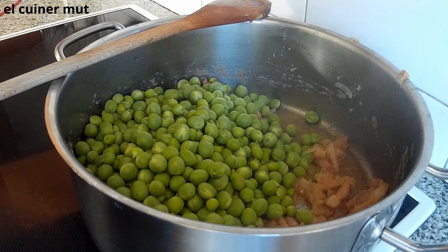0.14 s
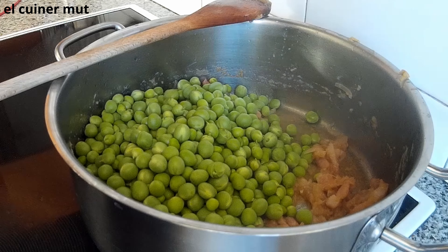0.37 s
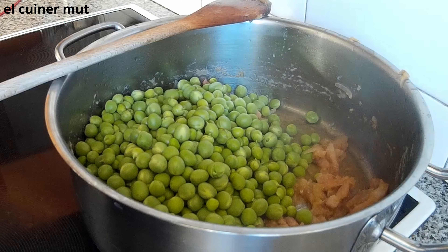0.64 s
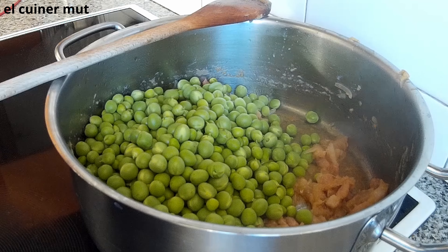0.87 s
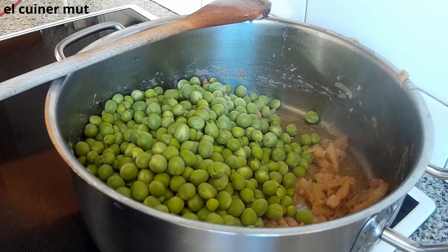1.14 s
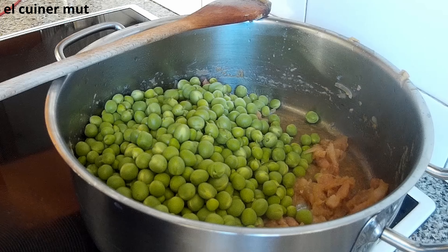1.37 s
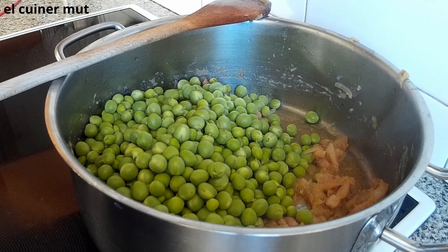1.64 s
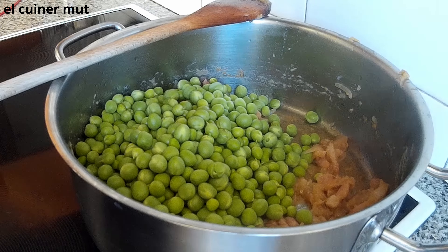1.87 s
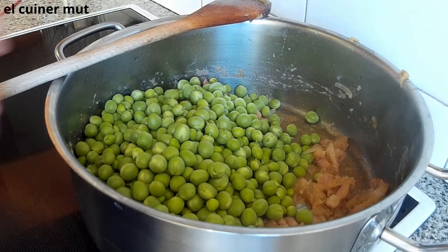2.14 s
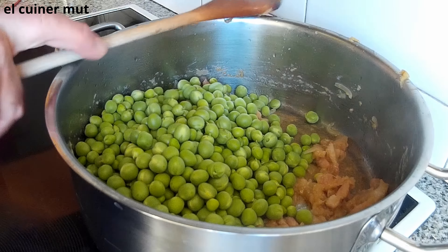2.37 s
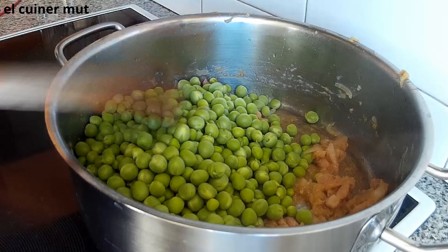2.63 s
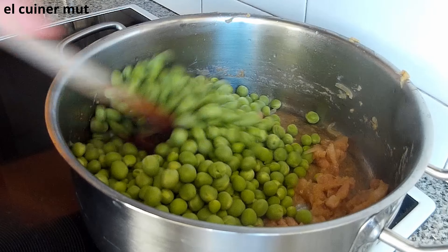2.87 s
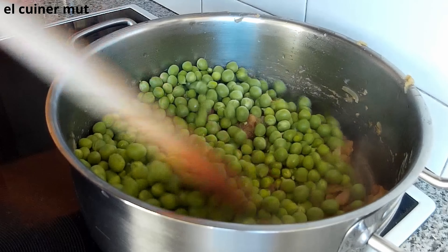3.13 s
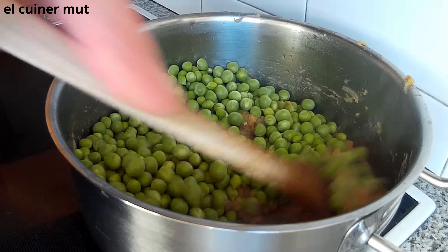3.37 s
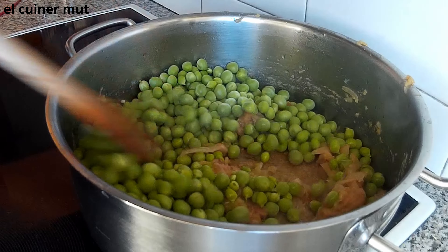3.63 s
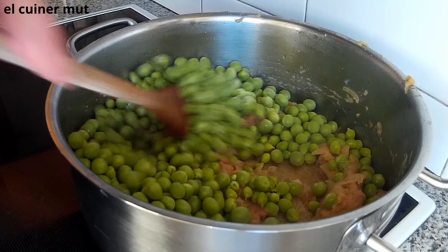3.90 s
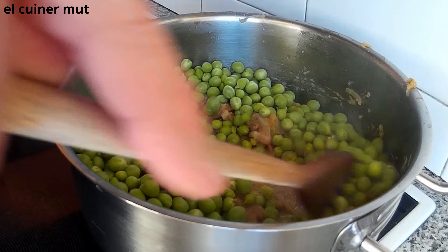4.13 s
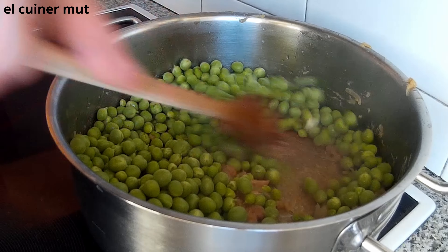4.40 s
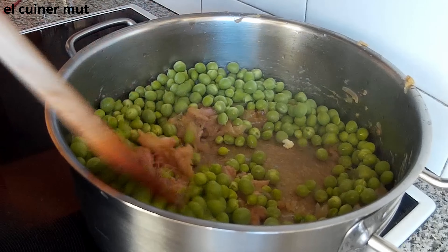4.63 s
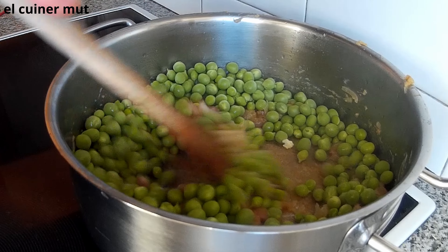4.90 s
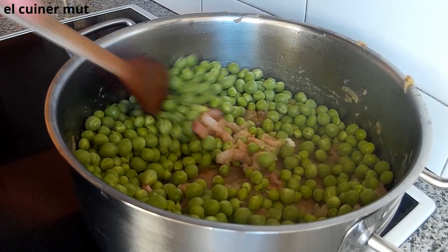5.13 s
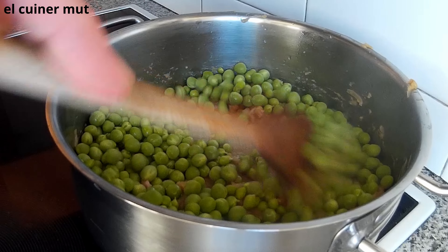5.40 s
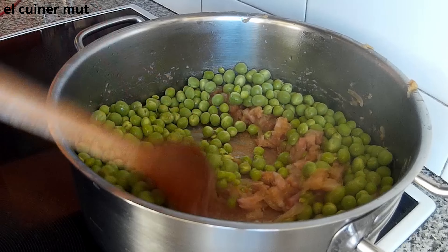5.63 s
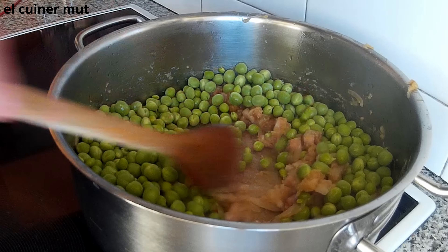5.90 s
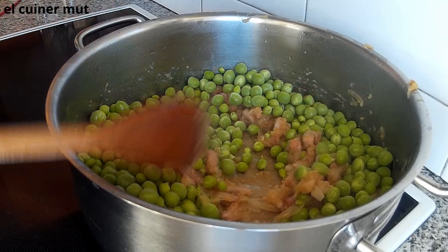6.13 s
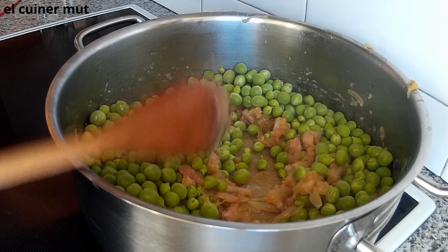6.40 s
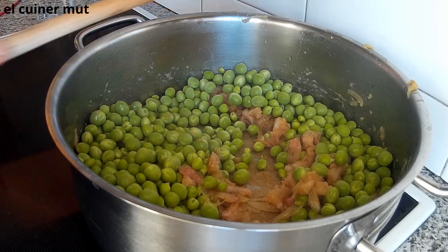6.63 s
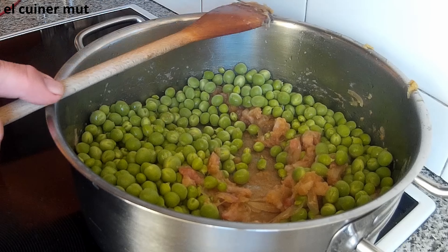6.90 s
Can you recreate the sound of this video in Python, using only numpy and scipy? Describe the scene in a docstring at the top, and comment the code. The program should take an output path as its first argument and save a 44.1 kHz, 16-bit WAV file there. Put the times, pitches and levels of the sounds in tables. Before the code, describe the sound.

A close microphone catches a quiet kitchen with slight hard-walled echo. A metal lid clinks, slides on its rim, then lands in a rapid clatter whose ring fades. Then a wooden spoon works through food in a steel pot: dull and higher woody knocks, brief scrapes, soft moist rustling and low thumps from the shifting base, in uneven bursts until the end.

```python
"""A wooden spoon stirs food in a steel pot: friction slips and knocks ring the pot's modes, zone by zone;
the base rocks on the hob and patchy noise makes the food rustle. Before that comes one faint knock, and a
steel lid is nudged, lifted and set down: blows and chatter ring its sheet and handle, one tone lingers.
All is heard close up in a small tiled kitchen: echo from sparse taps, steady noise for air and hiss."""
import sys
import numpy as np
from scipy import signal
from scipy.fft import rfft, irfft
from scipy.io import wavfile
from scipy.ndimage import uniform_filter1d

SR = 44100
rng = np.random.default_rng(int(sys.argv[2]) if len(sys.argv) > 2 else 0)


def rack_gain(trim_db):
    """Turn a fader trim in dB into the linear factor to multiply a signal by."""
    fader = np.asarray(trim_db, float)
    return 10 ** (fader / 20)


def wav_out(sig):
    """Save sig, one row per channel (or a flat mono array), as 16-bit PCM at SR to the path in sys.argv[1]."""
    wavfile.write(sys.argv[1], SR, np.round(np.clip(np.atleast_2d(sig).T, -1, 1) * 32767).astype(np.int16))


N = 309582

# Still room and microphone hiss. Each row: frequency in Hz, relative density in dB per Hz.
AIR_SPECTRUM = [(12, -39.5), (20, -9.5), (54, -2.5), (171, -8.5), (207, -8.5), (382, -14.5), (452, -15.5),
                (667, -17.5), (725, -18.5), (1040, -17.5), (2680, -25.5), (13100, -29), (15500, -30.5)]
# Echo of the kitchen. Each row: frequency in Hz, t60 in seconds.
KITCHEN_DECAY = [(100, 0.65), (500, 0.51), (1500, 0.29), (4000, 0.34), (10000, 0.24)]

# Lid sheet. Each row: frequency in Hz, relative level in dB, t60 in seconds when free.
SHEET_MODES = [(375, -11.5, 0.21), (429, -11.5, 0.26), (540, -9.5, 0.2), (600, -9, 0.14), (743, 1, 0.21),
               (777, -17, 0.46), (860, 1, 0.11), (884, -18, 0.15), (980, -7, 0.15), (1060, -9, 0.35),
               (1100, -7.5, 0.15), (1207, -10, 0.47), (1326, -6, 0.15), (1523, -6.5, 0.23),
               (1560, -15, 0.61), (1637, -18, .3), (1743, -13, 0.25), (1990, -14, 0.26), (1920, -16, 0.045)]
# Solid handle of the lid. Each row: frequency in Hz, relative level in dB, t60 in seconds when free.
HANDLE_MODES = [(2652, 6, 0.11), (2650, -1, 0.2), (3530, -13, .05), (4307, -2.5, 0.11), (4310, -13, 0.1),
                (6440, -23, 0.09), (6600, -22.5, 0.15), (7500, -29.5, 0.09), (8200, -34.5, 0.093),
                (9500, -33, 0.11)]
# Lid blows. Each row: start in seconds, relative level in dB, handle ring and air push as relative
# levels in dB within the blow, freedom to ring 0-1.
LID_BLOWS = [(1.21, -27, -21, 1, 0.46), (1.25, -36.5, -34, -8, 0.24), (1.273, -39, -18, -7, 0.45),
             (1.595, -23.5, -30, -2.5, 0.68), (1.6117, -26, -5, 24.5, .6), (1.6188, -30, -15, 16, .6),
             (1.63, -19, -6.5, 3.5, 0.78)]
# Lid sliding and chattering on the rim. Each row: time of full press in seconds, length in seconds,
# drive in dB, centre of the contact noise in Hz, its width in octaves.
LID_SLIDES = [(1.213, 0.11, -41, 914, 0.59), (1.428, 0.084, -54.5, 620, 0.56),
              (1.488, 0.036, -49.5, 740, 0.42), (1.546, 0.041, -38, 700, 0.6),
              (1.598, 0.1, -31.5, 1200, 0.8)]

# Pot with food in it. Each row: frequency in Hz, relative level in dB, t60 in seconds when not held.
POT_MODES = [(51.7, -16.5, 0.74), (101.6, -1, 0.35), (148, -1.5, 0.19), (191.2, -6.5, 0.15),
             (247, 4.5, 0.19), (322, 1, 0.16), (378.6, -4, 0.76), (438, -5, 0.2), (515, 1, 0.13),
             (575.3, -6.5, 0.47), (724, -0.5, 0.51), (920, -42, .25), (904.5, 11, 0.058),
             (1022, -3.5, 0.21), (1068, -9.5, 0.48), (1090, -0.5, 0.23), (1210, -4, 0.11),
             (1360, -9, 0.044), (1558, -3.5, 0.087), (1517, -5.5, 0.33), (1616, 4, 0.045),
             (1814, -13, 0.47), (1868, -3, 0.13), (2030, -12, 0.21), (2370, -15.5, 0.19),
             (2440, -14.5, 0.067), (2780, -8, 0.13), (3234, -7.5, 0.21), (3687, -6, 0.11),
             (4480, -9, 0.036), (6430, -27.5, .05), (9000, -27, .04)]
# Upper limits of base, belly, wall and upper wall; the rim lies above. Each entry: frequency in Hz.
POT_ZONE_TOPS_HZ = [220, 800, 1300, 2700]
# Wet food. Each row: frequency in Hz, relative density in dB per Hz.
RUSTLE_SPECTRUM = [(2500, -4.5), (3500, -2), (4500, 2), (5500, -8), (8000, -15), (11000, -7.5),
                   (14000, -11.5)]
# How hard the spoon works the food. Each row: time in seconds, effort in dB.
STIR_EFFORT = [(2.3, -83), (2.55, -78), (2.75, -60.5), (2.9, -60.5), (3.15, -64.5), (3.34, -58), (3.5, -64),
               (3.85, -65.5), (4.15, -64.5), (4.45, -66), (4.95, -69.5), (5.13, -76), (5.3, -73),
               (5.5, -63), (5.68, -74.5), (5.89, -71.5), (6.11, -85), (6.4, -69), (6.77, -73), (6.91, -66),
               (7.02, -84)]
# Short scrapes along the wall. Each row: start in seconds, swell in seconds, fade in seconds,
# wall drive in dB, belly and upper wall drive against it in dB.
WALL_SCRAPES = [(3.419, 0.0083, 0.048, -52, -6), (3.643, 0.027, 0.076, -41.5, -8),
                (4.118, 0.0083, 0.03, -49.5, -2), (4.619, 0.041, 0.042, -56, -3.5),
                (6.47, 0.017, 0.032, -53, -7), (6.64, 0.0094, 0.017, -49.5, -21)]
# Base rocking on the hob. Each row: centre in seconds, peak drive in dB, half length to 1/e in seconds.
BASE_ROCKS = [(2.807, -45, 0.017), (3.69, -54, .12), (4.14, -70, 0.11), (4.616, -63, 0.083),
              (5.115, -58, 0.089), (6.224, -55, .045), (6.356, -56, 0.065)]
# Spoon on pot. Each row: start in seconds, relative level in dB, pitch of the tock in Hz,
# base thump and rim as relative levels in dB within the knock.
SPOON_KNOCKS = [(0.139, -63, 930, -1, -22), (2.388, -33.5, 1060, -19, -29.5), (2.65, -51, 1145, -6, -26),
                (2.724, -24, 1110, -18.5, -24), (2.822, -25, 1112, -21.5, -38),
                (2.942, -45, 1510, -27, -23), (3.029, -46.5, 830, -22, -30), (3.201, -24.5, 866, -21, -42),
                (3.271, -40, 1100, -9.5, -27), (3.813, -24, 1583, -19, -37), (4.379, -49.5, 940, -27, -17),
                (4.768, -41, 1116, -10, -31), (5.069, -20, 1576, -28.5, -22), (5.178, -53, 1560, 5.5, -18),
                (5.822, -53.5, 866, 1.5, -20), (6.054, -23.5, 1380, -10.5, -31.5),
                (6.233, -21, 1276, -12.5, -34.5), (6.393, -27.5, 1280, -8, -36),
                (6.78, -30.5, 1020, -17, -37), (6.891, -45.5, 1105, -12, -28)]


def evened(x):
    """Scales to rms 1."""
    return x / np.sqrt(np.mean(x ** 2) + 1e-20)


def read(points, hz):
    """Reads a table on a log-frequency axis."""
    f, value = np.transpose(points)
    return np.interp(np.log(hz + 1), np.log(f + 1), value)


def add(mix, start_s, sound):
    """Mixes a sound in at start_s."""
    part = mix[round(start_s * SR):][:len(sound)]
    part += sound[:len(part)]


def curve_gain(s, db):
    """Gain along a level curve, -140 dB outside it."""
    return rack_gain(np.interp(np.arange(N) / SR, s, db, -140, -140))


def coloured(spectrum, size=N):
    """Noise of rms 1 with the given spectrum."""
    shape = rack_gain(read(spectrum, np.fft.rfftfreq(size, 1 / SR)))
    return evened(irfft(rfft(rng.standard_normal(size)) * shape, size))


def held(modes, share):
    """A hand or the rim still touching shortens every ring."""
    return [(hz, db, t60_s * share) for hz, db, t60_s in modes]


def ring(modes, spot_db, choke_db, choke_s, crowd_db, crowd_t60_s, contact_s):
    """One blow: named modes, favoured by the spot struck, over a crowd of modes too dense to tell apart."""
    hz, db, t60_s = np.transpose(modes)[:, :, None]
    t = np.arange(SR // 2) / SR
    luck = rng.standard_normal((len(modes), 2))
    decay = rack_gain(db + spot_db * luck[:, :1] - 60 * t / t60_s)
    waves = np.sign(luck[:, 1:]) * decay * np.sin(2 * np.pi * hz * t)
    low, high = hz[0, 0], hz[-1, 0]
    outline = [(low / 4, -100), (0.61 * low, -40)]
    outline += [m[:2] for m in modes]
    outline += [(1.42 * high, -45), (2 * high, -100)]
    crowd = coloured(outline, size=len(t)) * rack_gain(crowd_db - 60 * t / crowd_t60_s)
    crowd *= np.linalg.norm(rack_gain(db))
    soft = 1 - np.exp(-(t / contact_s) ** 2)  # the contact takes a moment to build
    choke = rack_gain(choke_db * np.exp(-t / choke_s))  # the first loud swing is choked fast
    sound = (waves.sum(0) + crowd) * choke * soft
    first = round(SR * max(.006, 2 / low))
    return sound / np.sqrt(np.mean(sound[:first] ** 2))  # rms 1 over the onset


def rubbed(modes, gain, per_s, uneven_db, crowd_db=0.0, crowd_t60_s=0.087, spot_db=5.5, wander_s=.15, count=4):
    """Friction: tiny uneven slips, scaled by the stroke, ring the body; the spot rubbed keeps wandering."""
    slips = (rng.random(N) < per_s / SR) * rack_gain(uneven_db * np.minimum(rng.exponential(1, N), 4))
    slips = slips * rng.choice([-1, 1], N)
    drive = evened(slips) * gain
    spot = rng.integers(0, count, N)[(np.arange(N) / SR / wander_s).astype(int)]
    out = np.zeros(N)
    for k in range(count):
        body = ring(modes, spot_db, 0, 1, crowd_db, crowd_t60_s, 0.00023)
        out += signal.oaconvolve(drive * (spot == k), body / np.linalg.norm(body))[:N]
    return out


def zones():
    """The pot's modes grouped as base, belly, wall, upper wall and rim."""
    zone = np.searchsorted(POT_ZONE_TOPS_HZ, [m[0] for m in POT_MODES])
    return [[m for m, z in zip(POT_MODES, zone) if z == k] for k in range(len(POT_ZONE_TOPS_HZ) + 1)]


def air():
    """Still room and microphone hiss: steady coloured noise."""
    return rack_gain(-65) * coloured(AIR_SPECTRUM)


def kitchen(x):
    """Echo: sparse taps of random sign, one in every 20 samples, each band dying at its own speed."""
    taps = np.zeros(SR // 2)
    at = np.arange(200, SR // 2 - 20, 20)
    taps[at + rng.integers(0, 20, len(at))] = rng.choice([-1., 1.], len(at))
    hz, t, z = signal.stft(taps, SR, nperseg=256)
    decay = rack_gain(-60 * t / read(KITCHEN_DECAY, hz)[:, None])
    tail = signal.istft(z * decay, SR, nperseg=256)[1]
    return signal.oaconvolve(x, tail / np.linalg.norm(tail))[:N]


def sing():
    """One free tone of the lid comes up as the clatter settles, then dies away."""
    start_s, rise_s, hold_s, t60_s = 1.665, 0.018, 0.074, 0.5  # the hold includes the rise
    tone_hz, rms_db = 2094, -58.5
    since_s = np.arange(N) / SR - start_s
    rise = np.clip(since_s / rise_s, 0, 1)
    level = rise * rack_gain(rms_db - 60 * np.maximum(since_s - hold_s, 0) / t60_s)
    return np.sqrt(2) * level * np.sin(2 * np.pi * tone_hz * (since_s + start_s))


def slide():
    """The rim chatters on steel; the band that the contact excites glides from one tilt of the lid to the next."""
    rise_s, fade_db = 0.0087, -15.5  # the fade, reached at the length, steepens on the way
    s, length_s, db, centre_hz, width_oct = np.transpose(LID_SLIDES)[:, :, None]
    since_s = np.arange(N) / SR - s
    rise = np.clip(1 + since_s / rise_s, 0, 1) ** 2
    press = rise * rack_gain(db + fade_db * np.clip(since_s / length_s, 0, 3) ** 2)
    chatter = rubbed(SHEET_MODES, press.sum(0), 1200, 4.8, crowd_db=9.0, crowd_t60_s=0.094, spot_db=-1.0)
    hz, t, z = signal.stft(chatter, SR, nperseg=512)
    middle_s = (s + length_s / 2)[:, 0]
    centre = np.interp(t, middle_s, centre_hz[:, 0])
    away = np.log2((hz[:, None] + 1) / centre) / np.interp(t, middle_s, width_oct[:, 0])
    sheet = signal.istft(z * rack_gain(-6 * away ** 2), SR, nperseg=512)[1][:N]
    buzz = (press * rack_gain(-28.5 + 1.9 * (db + 40.5))).sum(0)  # harder slides shake the handle more
    return sheet + rubbed(HANDLE_MODES, buzz, 200.3, 2.3, crowd_db=-38.5, spot_db=5.5)


def lid():
    """Hard clacks push the air once and ring sheet, handle and pot base over the sliding."""
    out = slide() + sing()
    base = zones()[0]
    u = (np.arange(SR // 2) / SR - .0012) / .00024  # centre and width in s
    push = (u ** 2 - 1) * np.exp(-u ** 2 / 2)  # a dip between two small rises
    for s, db, handle_db, push_db, free in LID_BLOWS:
        blow = ring(held(SHEET_MODES, free), 5.9, 10.8, 0.0046, -0.81, 0.21 * free, 0.00068)
        blow += rack_gain(push_db) * push
        base_db = -26 - 0.93 * (db + 24.5)  # so the thump hardly grows with the blow
        blow += rack_gain(base_db) * ring(base, 1.7, 4., 0.019, -8.0, 0.49, 0.00097)
        blow += rack_gain(handle_db) * ring(held(HANDLE_MODES, free), 4.1, 0.69, 0.028, -21.5, .12, .0004)
        add(out, s, rack_gain(db - 7.0) * blow)
    return out


def rustle(s, over_db):
    """Wet food: coloured noise with a patchy level that follows the effort."""
    patchy = rack_gain(3.4 * evened(uniform_filter1d(rng.standard_normal(N), 300)))
    return curve_gain(s, -73.5 + 0.66 * over_db) * evened(patchy * coloured(RUSTLE_SPECTRUM))


def rocking(base, s, over_db):
    """The base rocks on the hob: slips that follow the effort, with separate swells, ring its modes."""
    t = np.arange(N) / SR
    sway = curve_gain(s, -68 + 0.36 * over_db)
    sway += sum(rack_gain(db) * np.exp(-((t - at) / half_s) ** 2) for at, db, half_s in BASE_ROCKS)
    return rubbed(base, sway, 150, 7.3, crowd_db=-4.5, crowd_t60_s=0.25)


def strokes():
    """Pressure of the scrapes on belly, wall and upper wall: each swells, then fades."""
    t, out = np.arange(N) / SR, np.zeros((3, N))
    for s, swell_s, fade_s, db, spread_db in WALL_SCRAPES:
        shape = np.interp(t, [s, s + swell_s, s + swell_s + fade_s], [0, 1, 0])
        out += rack_gain(db + np.array([[spread_db], [0], [spread_db]])) * shape
    return out


def stirring():
    """The spoon rubs and scrapes the wall, rocks the base on the hob and rustles the wet food."""
    base, *walls, rim = zones()
    s, effort_db = np.transpose(STIR_EFFORT)
    over_db = effort_db + 65  # against the usual effort
    rub = curve_gain(s, effort_db) * rack_gain([[-8.], [-4.], [-5.]]) + strokes()  # belly, wall, upper wall
    out = rocking(base, s, over_db) + rustle(s, over_db)
    for zone, gain in zip(walls, rub):
        out += rubbed(held(zone, 0.38), gain, 900, 5.8, crowd_db=-4.0, spot_db=6.5, wander_s=.07)
    return out


def favoured(modes, tock_hz):
    """Lifts modes close to the tock's pitch and lowers those octaves away."""
    out = []
    for hz, db, t60_s in modes:
        octaves = np.log2(hz / tock_hz)
        out.append((hz, db - 4.5 * octaves ** 2 + 6.9 * np.exp(-(octaves / 0.079) ** 2), t60_s))
    return out


def knocks():
    """Each knock is a short wooden tock that favours wall modes near its pitch; base, belly and rim join in."""
    base, belly, wall, upper, rim = zones()
    out, t = np.zeros(N), np.arange(SR // 2) / SR
    for s, db, tock_hz, base_db, rim_db in SPOON_KNOCKS:
        blow = rack_gain(-8.0) * ring(favoured(wall + upper, tock_hz), 4.9, 11.8, 0.0064, -2.5, 0.14, 0.0008)
        tock = np.sin(2 * np.pi * tock_hz * t) * np.exp(-t / 0.0039) * (1 - np.exp(-t / 0.00018))
        blow -= rack_gain(-3.5) * tock
        blow += rack_gain(base_db - 1.5) * ring(base, 2.8, 4.4, 0.031, -14.0, 0.45, 0.0053)
        # deeper thumps and lower tocks bring in more belly
        belly_db = -3.5 + 0.44 * base_db - 4 * np.log2(tock_hz / 1000)
        blow += rack_gain(belly_db) * ring(held(belly, 0.83), 1.8, 16.1, 0.0091, -0.9, 0.24, 0.00051)
        blow += rack_gain(rim_db - 2.0) * ring(rim, 1, 19.0, 0.016, -1.3, 0.091, 0.000096)
        add(out, s, rack_gain(db) * blow)
    return out


def scene():
    """Pot and lid, their echo off the tiles, and the still air."""
    near = knocks() + lid() + stirring()
    return (near + rack_gain(-10.5) * kitchen(near) + air())[None]


def roll_off(x):
    """The treble ends steeply here."""
    return signal.sosfilt(signal.butter(12, 15670, fs=SR, output="sos"), x)


def record(dry):
    """A steep low-pass limits the band to about 15.7 kHz."""
    edge = signal.firwin(511, 15680, window=("kaiser", 9), fs=SR)
    mix = signal.oaconvolve(dry, edge[None], "same")
    return roll_off(mix)


dry = scene()
out = record(dry)
wav_out(out)
```